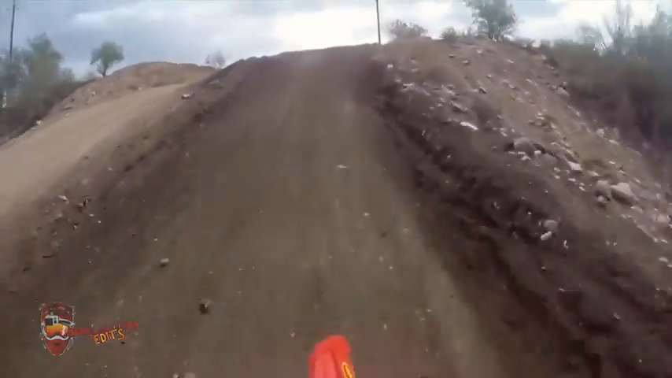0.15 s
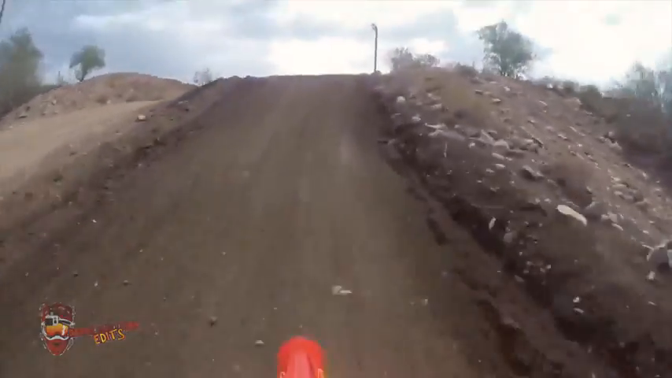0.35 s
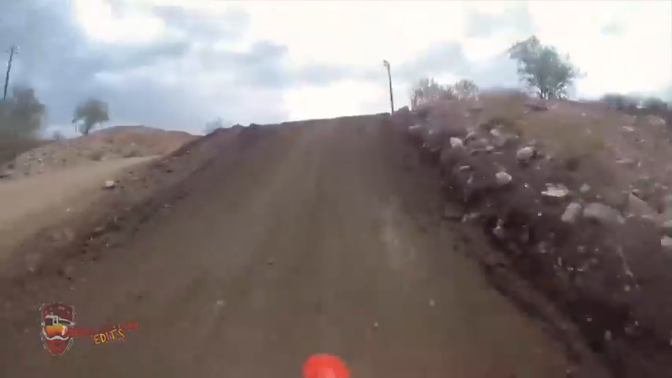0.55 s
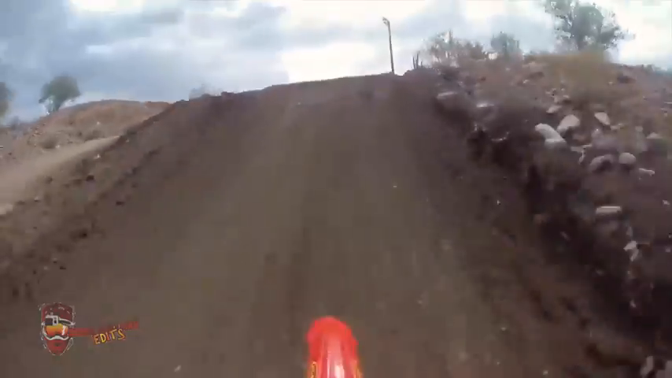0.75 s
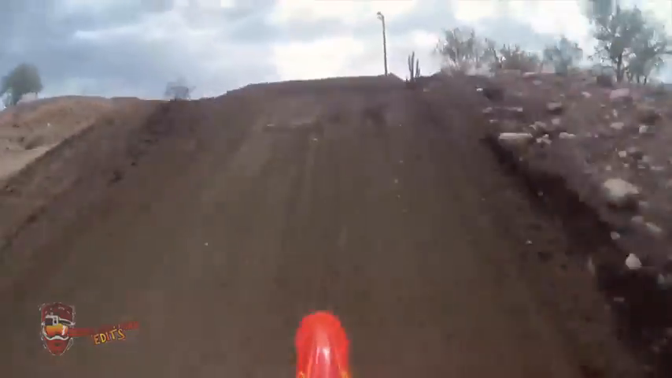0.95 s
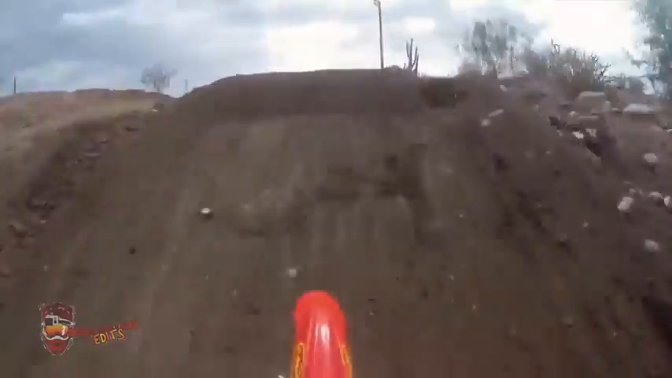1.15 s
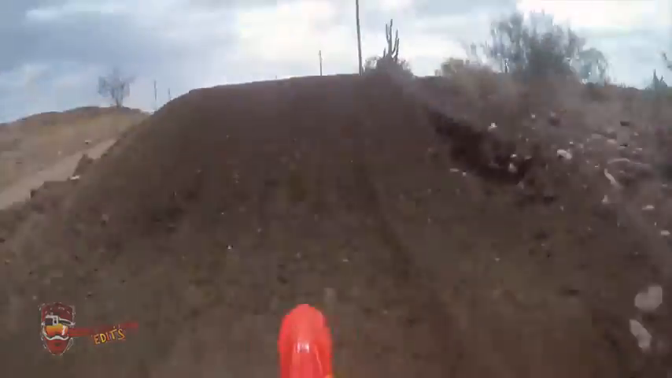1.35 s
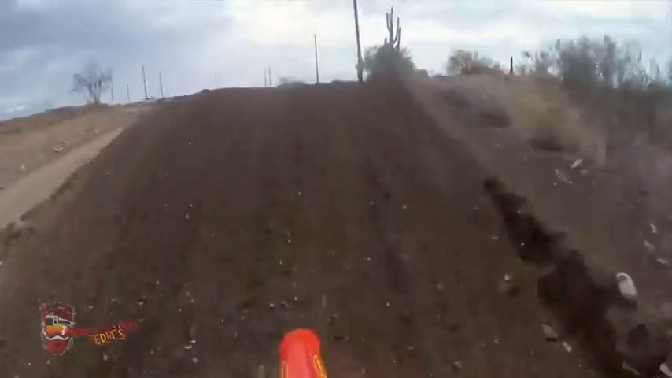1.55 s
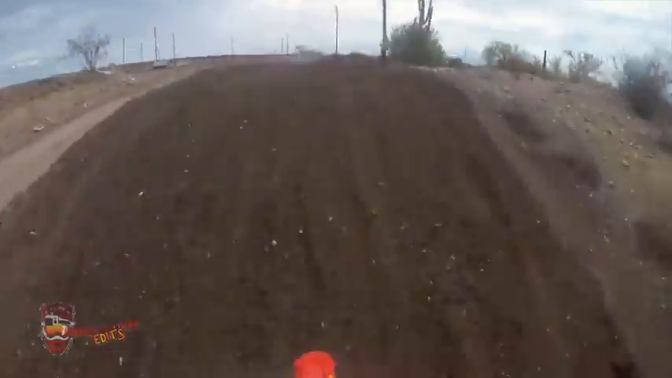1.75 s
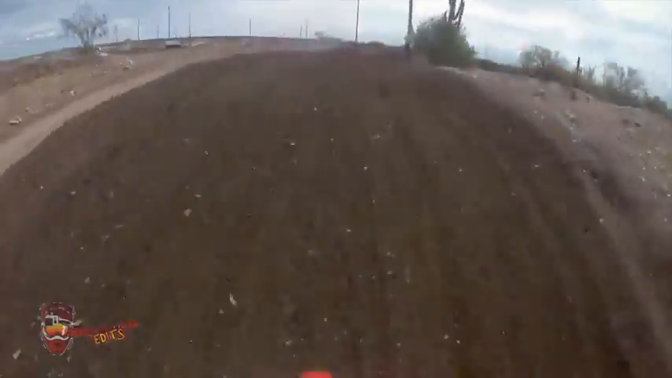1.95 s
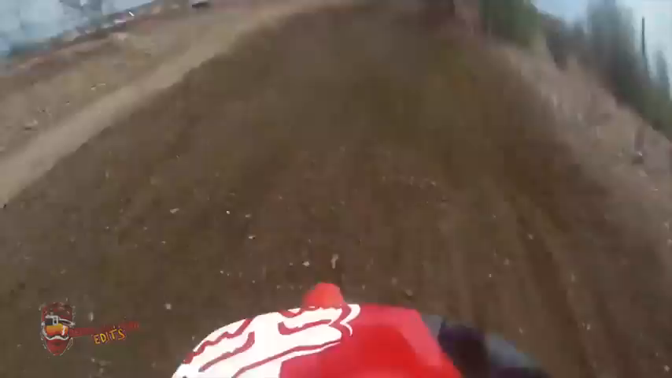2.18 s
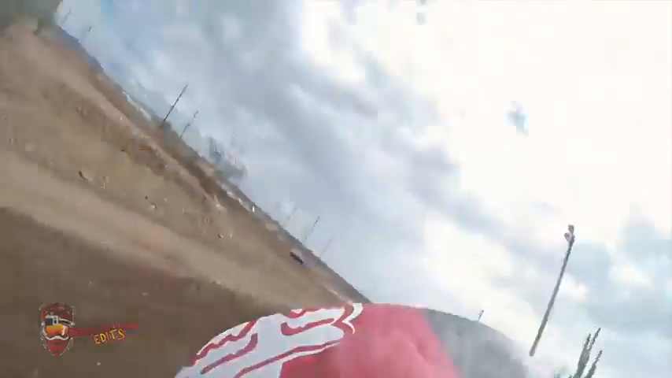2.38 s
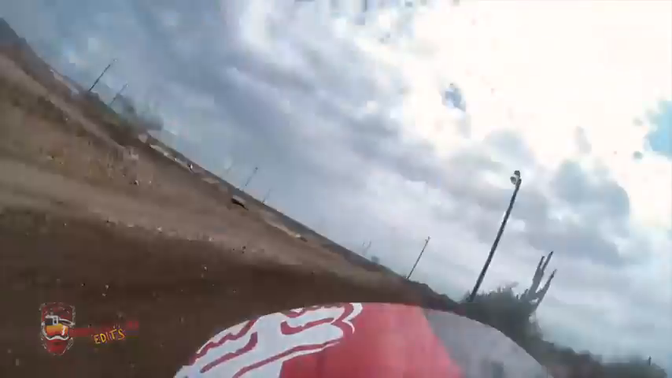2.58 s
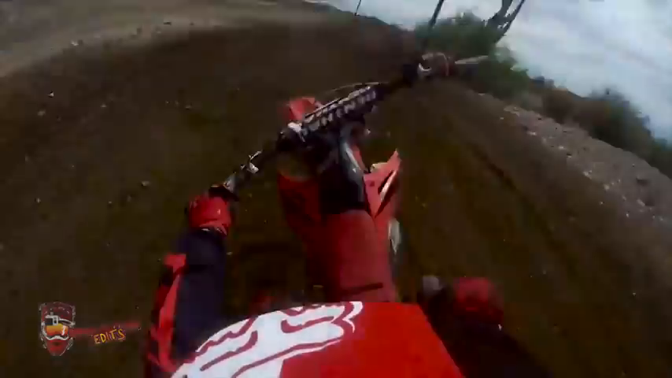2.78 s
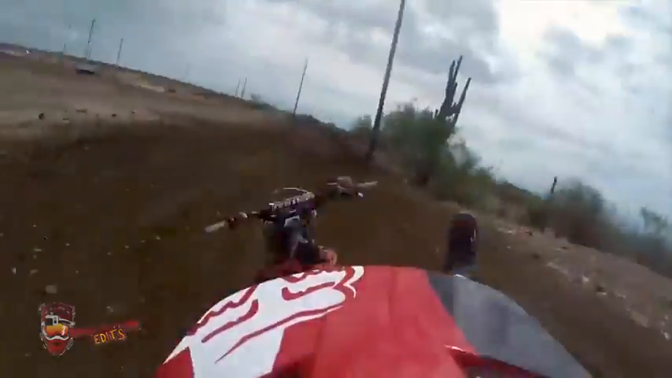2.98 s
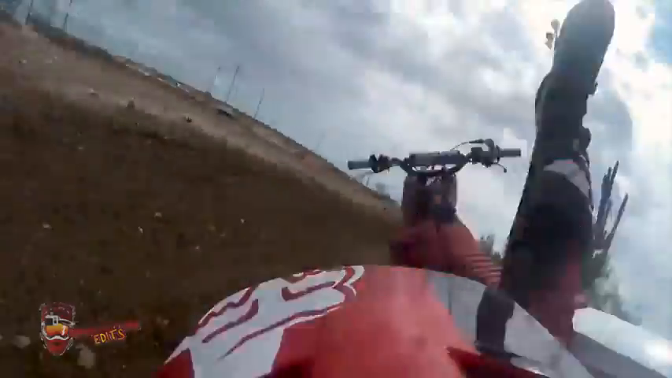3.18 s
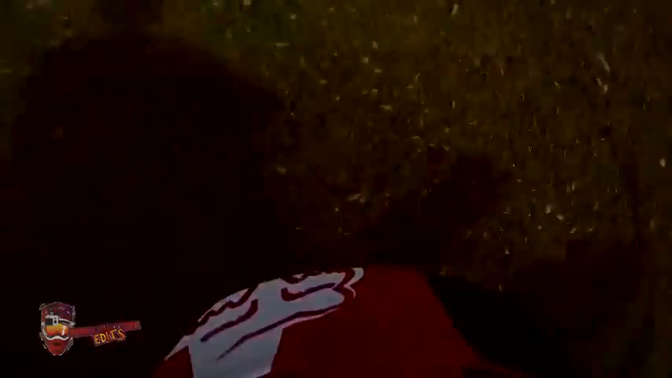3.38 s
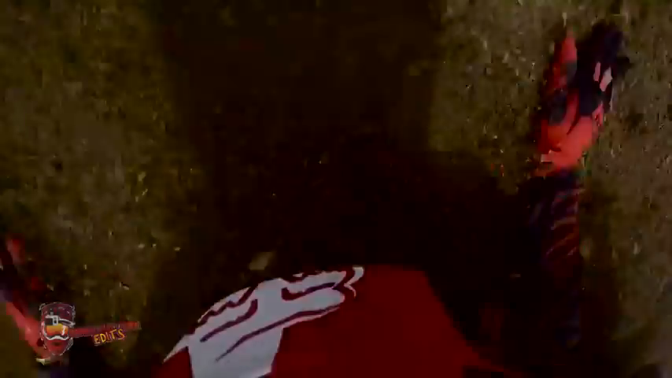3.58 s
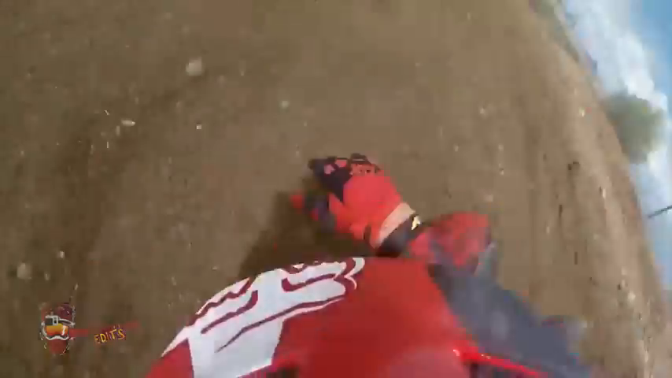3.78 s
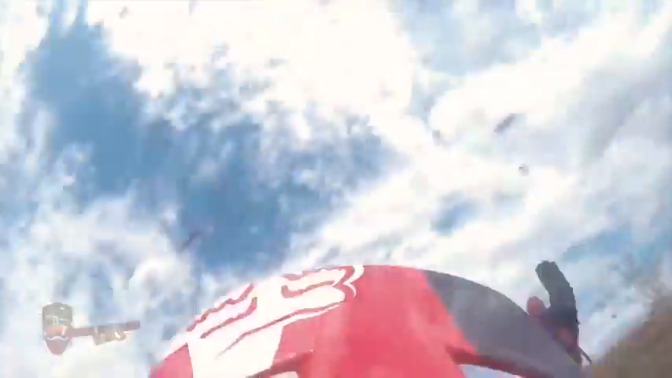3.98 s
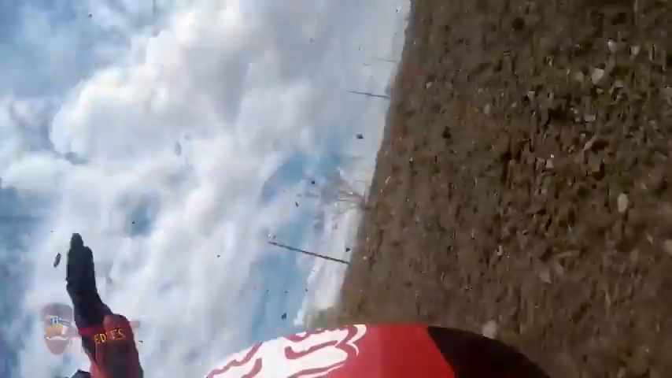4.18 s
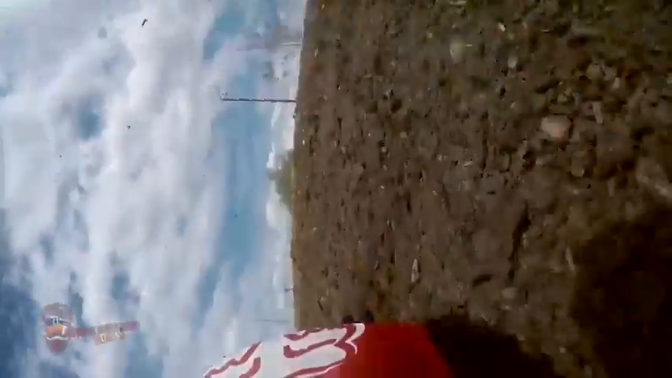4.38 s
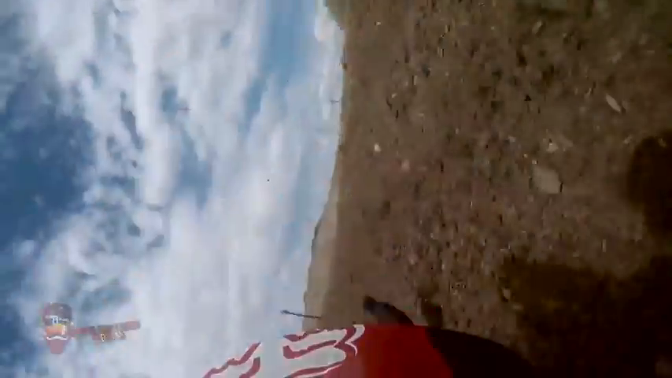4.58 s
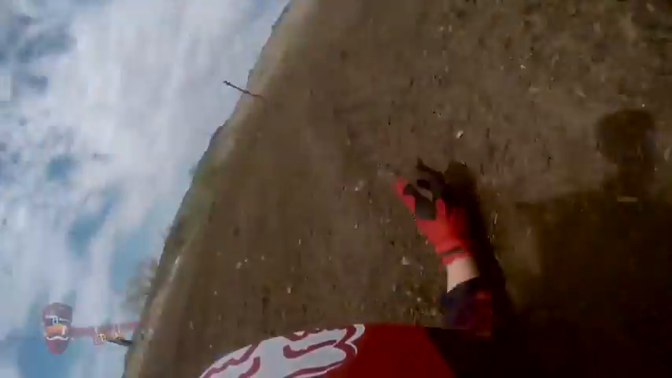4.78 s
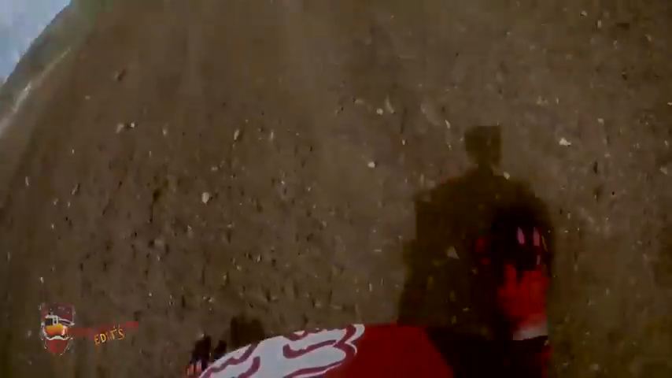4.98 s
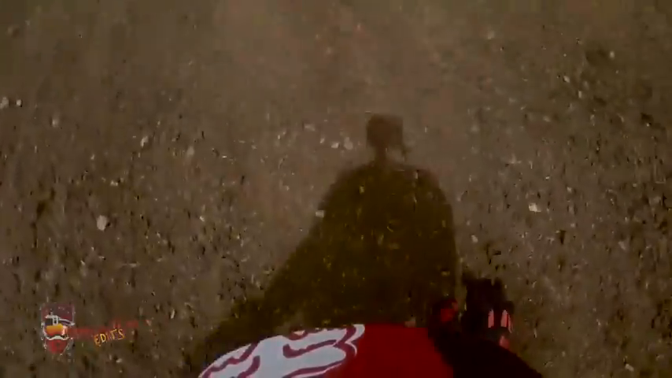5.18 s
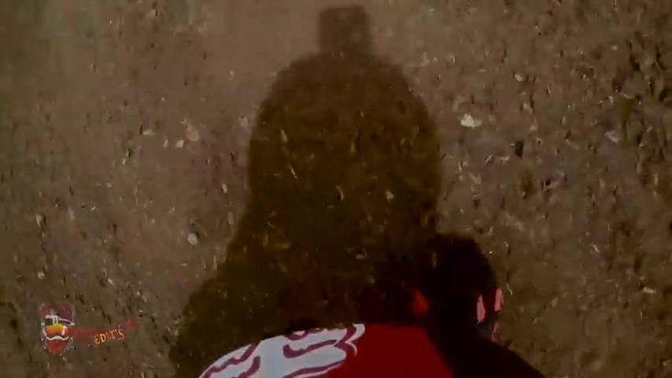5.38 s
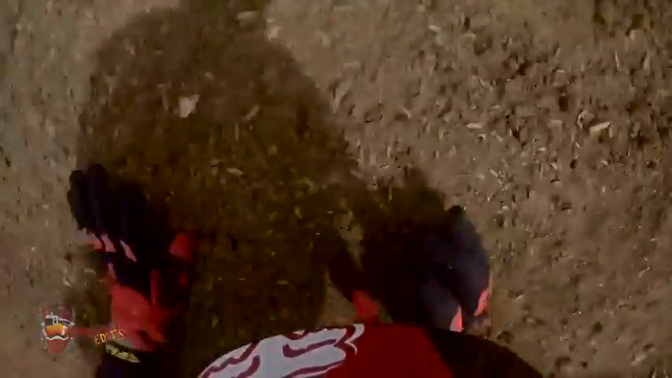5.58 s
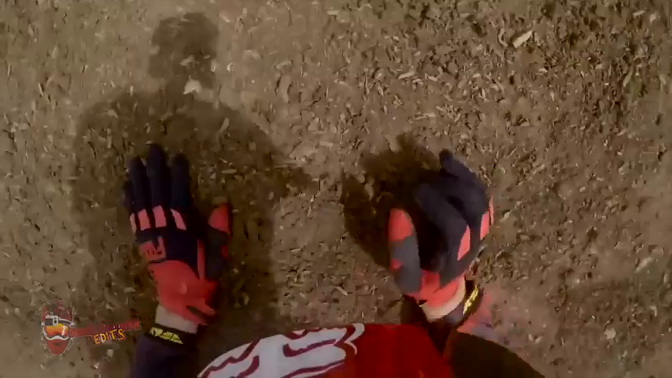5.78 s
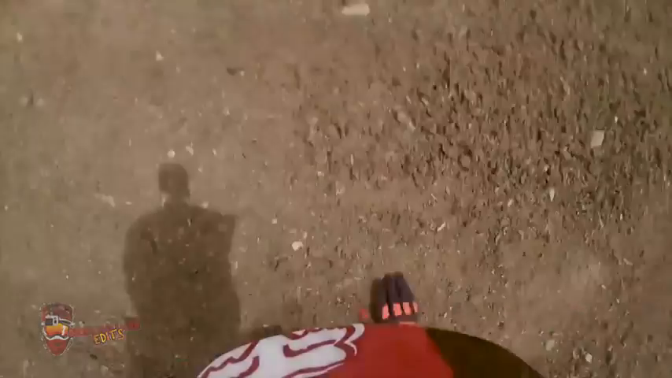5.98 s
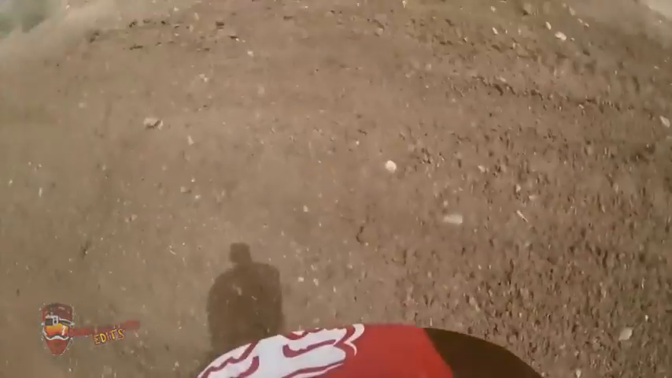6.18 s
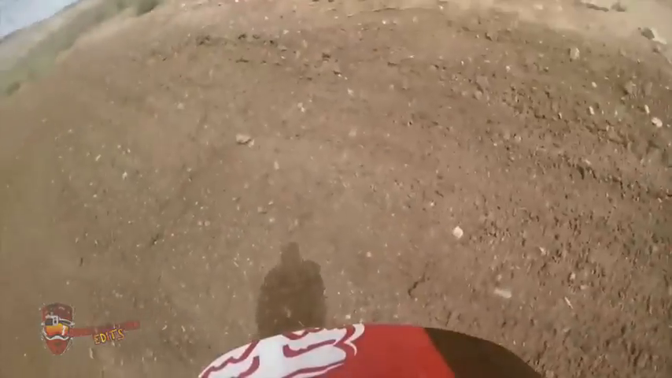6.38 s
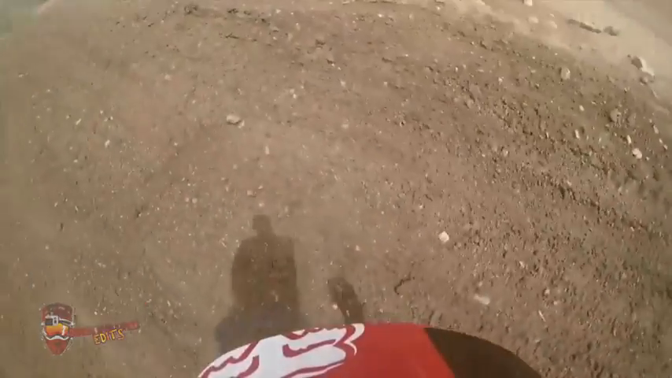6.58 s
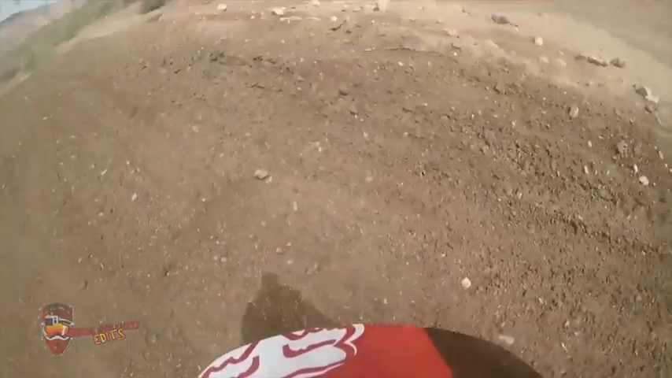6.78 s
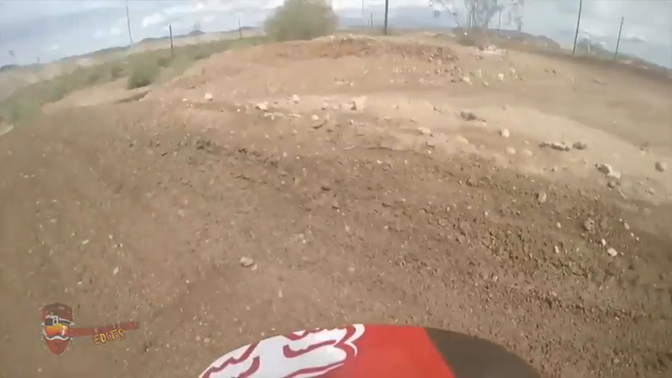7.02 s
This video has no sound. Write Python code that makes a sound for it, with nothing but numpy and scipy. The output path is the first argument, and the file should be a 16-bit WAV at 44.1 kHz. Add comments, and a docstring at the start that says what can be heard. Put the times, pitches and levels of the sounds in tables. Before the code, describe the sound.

A dirt bike engine rasps and screams higher up a jump, snaps off, then the rider tumbles with heavy thumps, helmet knocks, scrapes and grit.

```python
"""On a dirt jump, at a microphone on the rider's helmet camera: a single-cylinder dirt bike climbs.
Harmonic orders of the crank, turbulence and gear whine waver as the tyre grips and slips, soar at the lip,
then stop as the throttle snaps shut. The rider tumbles: struck modes of the helmet knock, scrape and squeal,
stones and grit spray on it, and the springy camera mount thumps with every jolt. Coloured noise makes the
wind on the mount, a rush of air and dirt whose level dips and swells back, and the faint microphone hiss."""
import sys
import numpy as np
from scipy import signal
from scipy.fft import rfft, irfft, next_fast_len
from scipy.io import wavfile
from scipy.ndimage import uniform_filter1d

SR = 44100
rng = np.random.default_rng(int(sys.argv[2]) if len(sys.argv) > 2 else 0)


def bounce(signal):
    """Save signal as a 16-bit WAV file at the path given by the first command-line argument."""
    frames = np.transpose(np.atleast_2d(signal))
    limited = np.clip(frames, -1, 1)
    pcm = np.round(limited * 32767).astype(np.int16)
    wavfile.write(sys.argv[1], SR, pcm)


N = 310905
TIME = np.arange(N) / SR
THROTTLE_SHUT_S = 2.161


def from_db(db):
    """Logarithmic levels: decibels to amplitude gain."""
    return 10 ** (np.asarray(db) / 20)


def rms_one(x):
    """Normalisation: scale to unit mean power."""
    return x / np.sqrt(np.mean(x ** 2) + 1e-20)


def levelled(x):
    """Levelling: divide by the running RMS over about 60 ms."""
    power = uniform_filter1d(x ** 2, size=2600)
    return x / np.sqrt(np.abs(power) + 1e-6)


def in_time(rows):
    """Linear interpolation: each column of a curve at every sample."""
    s, *columns = np.transpose(rows)
    return [np.interp(TIME, s, c) for c in columns]


def drift(rate):
    """Band-limited chance: random knots, rate per second, joined by lines; unit RMS."""
    knots = rng.standard_normal(N // 8)
    return rms_one(np.interp(TIME * rate, np.arange(len(knots)), knots))


def coloured(x, spectrum):
    """Linear filtering: a (pitch_hz, level_db) response on a log-frequency axis; unit power."""
    hz, db = np.transpose(spectrum)
    size = next_fast_len(N)
    log_f = np.log(np.fft.rfftfreq(size, 1 / SR) + 1)
    # silent beyond both ends of the response
    gain = from_db(np.interp(log_f, np.log(hz), db, -np.inf, -np.inf))
    return rms_one(irfft(rfft(x, size) * gain, size)[:N])


def add(track, s, sound):
    """Superposition: mix a sound in at a time."""
    start = int(np.clip(s * SR, 0, N - 1))
    track[start:start + len(sound)] += sound[:N - start]


# crank speed under power; columns: start_s [s], speed [turns/s]
REVS_TABLE = [(0.02, 133), (0.14, 155), (0.19, 142), (0.27, 182), (0.35, 209), (0.41, 149), (0.52, 168),
              (0.56, 143), (0.6, 160), (0.69, 159), (0.74, 148), (0.83, 162), (0.95, 160), (1.03, 173),
              (1.08, 144), (1.17, 185), (1.21, 143), (1.3, 167), (1.37, 129), (1.43, 124), (1.48, 162),
              (1.52, 125), (1.66, 187), (1.73, 209.5), (1.87, 224), (2.07, 234), (2.17, 245)]
# crank speed with the throttle shut; columns: start_s [s], speed [turns/s]
COASTING_REVS = [(2.3, 214), (2.6, 174), (2.9, 171), (3.08, 200), (3.27, 208), (3.6, 220)]


def crank(wobble):
    """Phase is the integral of speed: crank angle in radians, with random cycle-to-cycle wobble."""
    speed, = in_time(list(REVS_TABLE) + list(COASTING_REVS))
    return 2 * np.pi * np.cumsum(speed) / SR + wobble * drift(130)


def firing(angle, start_s, end_s, half_db, waver_db, count=66, size=30):
    """Fourier series: wavering crank orders make pulses; the four-stroke cycle adds half orders."""
    phases = rng.uniform(0, 2 * np.pi, count)
    live = slice(*np.searchsorted(TIME, [start_s, end_s]))
    knots_s = np.linspace(start_s, end_s, size)
    pulses = np.zeros(N)
    for k in range(1, count):
        # odd k are the half orders
        gains = from_db(half_db * (k % 2) + waver_db * rng.standard_normal(size))
        order = np.cos(k * angle[live] / 2 + 0.75 * phases[k])
        pulses[live] += np.interp(TIME[live], knots_s, gains) * order
    return pulses


# engine load on a decibel scale; columns: start_s [s], level_db [dB]
LOAD_TABLE = [(0.0, -38), (0.25, -33.5), (0.53, -40.5), (1.15, -36.5), (1.26, -38.5), (1.28, -42),
              (1.36, -49.5), (1.43, -46.5), (1.44, -38.5), (1.55, -39), (1.75, -31), (1.86, -34),
              (1.9, -32.5), (2.05, -33), (2.15, -34)]
CRUISE_DB = -37  # the load that counts as cruising
# the engine cleans up near the top; columns: speed [turns/s], turbulent share of the rasp [0-1]
TURBULENT_SHARE = [(130, 0.46), (160, .42), (210, 0.36), (245, 0.01)]
# resonances of the exhaust pipe; columns: pitch_hz [Hz], level_db [relative dB]
PIPE_COLOUR = [(560, -4), (700, -8), (900, -5.5), (1000, -8.5), (1190, .5), (1290, -1), (1440, -2),
               (1650, -5.5), (1900, -11), (2200, -32)]
# resonances of the rasp; columns: pitch_hz [Hz], level_db [relative dB]
RASP_COLOUR = [(1500, -61), (1850, -2.5), (2060, 13), (2300, 8), (2430, -2), (2600, 10), (2750, -0.5),
               (2950, -3.5), (3150, -18), (3600, -14), (4400, -49)]
# resonances of the engine's hiss; columns: pitch_hz [Hz], level_db [relative dB]
HISS_COLOUR = [(1880, -52), (3200, 0), (3460, -9), (4090, 3.5), (4220, -1), (4480, -8), (5220, -0.5),
               (5910, -3.5), (6400, -2), (7210, -8.5), (8120, -9.5), (9510, -21.5), (12400, -18.5),
               (14500, -31), (15500, -33)]
# each part of the engine: level at cruising load (dB) and its share of the load's swing
BOOM_DB, BOOM_FOLLOWS = -1.5, 0.97
PIPE_DB, PIPE_FOLLOWS = -26, 0.99
RASP_DB, RASP_FOLLOWS = -24, 0.74
HISS_DB, HISS_FOLLOWS = -37, 1.21
BURBLE_DB = -39  # follows the load as the rasp does


def engine(angle):
    """Source-filter principle: load drives orders, pulses and turbulence through fixed resonances."""
    load_db = in_time(LOAD_TABLE)[0] - CRUISE_DB
    speed, = in_time(REVS_TABLE)
    rough = np.interp(speed, *np.transpose(TURBULENT_SHARE))
    pulses = firing(angle, 0, THROTTLE_SHUT_S, half_db=-21, waver_db=6.5)
    pulses *= from_db(1.9 * drift(160))
    puffs = rng.standard_normal(N) * (1 + 0.058 * np.cos(angle) + 0.093 * np.cos(angle / 2))

    def band(spectrum, turbulent):
        """Power sharing: pulses and turbulence through the same resonances."""
        turbulent = np.clip(turbulent, 0, 1)
        tonal = np.sqrt(1 - turbulent) * levelled(coloured(pulses, spectrum))
        return tonal + np.sqrt(turbulent) * coloured(puffs, spectrum)

    boom = from_db(BOOM_DB + BOOM_FOLLOWS * load_db) * exhaust_boom(angle, speed, waver_db=2.5)
    pipe = from_db(PIPE_DB + PIPE_FOLLOWS * load_db) * band(PIPE_COLOUR, 0.5 * rough)
    rasp = from_db(RASP_DB + RASP_FOLLOWS * load_db) * band(RASP_COLOUR, rough)
    hiss = from_db(HISS_DB + HISS_FOLLOWS * load_db) * band(HISS_COLOUR, rough + 0.52)
    burble_colour = [(110, -28.0), (200, 13), (310, 8), (480, 5.5), (700, -19), (900, -20)]
    burble = from_db(BURBLE_DB + RASP_FOLLOWS * load_db) * coloured(puffs, burble_colour)
    throttle = np.clip((THROTTLE_SHUT_S - TIME) / 0.0016, 0, 1)  # shuts within 1.6 ms
    return throttle * (boom + pipe + rasp + hiss + burble + gears(angle, flutter=0.0076))


# what the silencer lets through of a low order; columns: pitch_hz [Hz], level_db [relative dB]
SILENCER_RESPONSE = [(70, -27), (130, -45), (160, -31), (185, -25), (212, -21.5), (225, -17.5),
                     (234, -19.5), (248, -11), (270, -24), (298, -19), (325, -26), (375, -26.5),
                     (420, -40.5), (470, -29), (560, -31), (620, -49.5), (670, -41), (900, -81.5)]


def exhaust_boom(angle, speed, waver_db, count=4):
    """Resonance: the lowest orders swell and fade as the revs carry them through the silencer."""
    hz, db = np.transpose(SILENCER_RESPONSE)
    boom = np.zeros(N)
    for order in range(1, count + 1):
        level_db = np.interp(order * speed, hz, db) + waver_db * drift(70)
        boom += np.sqrt(2) * from_db(level_db) * np.sin(order * angle + order ** 2)
    return boom


# whine of the gears; columns: start_s [s], pitch_hz [Hz], level_db [dB]
GEAR_WHINE = [(0, 2054, -36), (.5, 2039, -45), (1.0, 2200, -53), (1.28, 2163, -31.5), (1.41, 2034, -26.5),
              (1.5, 2004, -38), (1.64, 2078, -21.5), (1.8, 2137, -29.5), (1.95, 2143, -22),
              (2.16, 2268, -30)]


def gears(angle, flutter):
    """Amplitude modulation: meshing teeth whine; the crank's uneven pull adds sidebands."""
    hz, db = in_time(GEAR_WHINE)
    mesh = 2 * np.pi * np.cumsum(hz * (1 + flutter * drift(90))) / SR
    waver_db = 3 * drift(35)
    return np.sqrt(2) * from_db(db + waver_db) * np.sin(mesh) * (1 + 0.41 * np.cos(angle))


# jolts of the camera mount; columns: centre_s [s], level_db [dB], pitch_hz [Hz], swell_s [s]
MOUNT_JOLTS = [(0.305, -6.5, 86.14, 0.013), (0.466, -4.5, 86, 0.009), (0.634, -6, 85.3, 0.012),
               (1.226, -7.5, 56.3, 0.0073), (1.531, -5.5, 84.6, 0.016), (2.045, -12, 24, 0.017),
               (2.181, 1.5, 106, 0.0028), (2.315, -8, 101, 0.0054), (2.471, -0.5, 103, 0.0025),
               (2.859, -6, 69, 0.0058), (2.889, -10, 67, 0.0057), (2.932, -13.5, 44, 0.025),
               (2.956, -1.5, 99, 0.0026), (3.281, -5.5, 82, .012), (3.343, -13.5, 39.4, 0.019),
               (3.457, -8, 87, 0.0039), (3.757, -4, 72.5, 0.0044), (3.883, -2.5, 100, 0.0039),
               (3.927, -10, 87, 0.0037), (4.115, -3.5, 67, 0.006), (4.133, 3, 118, 0.0016),
               (4.167, -7, 93, 0.0023), (4.497, 1.5, 76, 0.0027), (5.347, -0.4, 97.6, 0.0071),
               (5.494, -10.5, 87, 0.01), (5.529, 1, 104, 0.0036), (5.611, -2, 106, 0.0069),
               (6.416, -13.5, 71, 0.0098), (6.53, -8, 69.5, 0.0092), (6.598, 0.5, 66.4, .006),
               (6.924, -3, 76, 0.0084)]


def jolts(mount_hz, mount_t60, mount_db, size=13230):
    """Forced and free vibration: each jolt shoves the camera to and fro; its springy mount rings on."""
    out = np.zeros(N)
    t = np.arange(size) / SR - .08  # the swell begins ahead of its centre
    for s, db, hz, swell_s in MOUNT_JOLTS:
        shove = -np.exp(-(t / swell_s) ** 2 / 2) * np.sin(2 * np.pi * hz * t)
        after = ring(shove, mount_hz, mount_t60)
        after = from_db(mount_db) * after / np.abs(after).max()
        add(out, s + t[0], from_db(db) * (shove + after))
    return out


def ring(force, hz, t60):
    """Damped harmonic oscillator: one mode driven by a force."""
    r, w = from_db(-60 / (max(t60, .001) * SR)), 2 * np.pi * hz / SR
    return signal.lfilter([0, np.sin(w)], [1, -2 * r * np.cos(w), r * r], force + 1e-18)


def body(force, modes):
    """Modal superposition: a force rings all the modes of one part."""
    return sum((-1) ** k * from_db(db) * ring(force, hz, t60) for k, (hz, db, t60) in enumerate(modes))


def strike(modes, crunch_s, crunch, size=4410):
    """Impulse response: a contact and its crumbling aftermath ring the modes; set to 10 ms of unit power."""
    t = np.arange(size) / SR
    force = crunch * rng.standard_normal(size) * rng.exponential(1, size) * np.exp(-t / crunch_s)
    force[0] += 1
    # each strike excites the modes a little differently
    varied = [(hz, db + rng.normal(0, 2.8), t60) for hz, db, t60 in modes]
    sound = body(force, varied)
    return sound / np.sqrt(np.sum(sound ** 2) / (SR / 100))


# modes of the helmet shell; columns: pitch_hz [Hz], level_db [relative dB], t60_s [s]
SHELL_MODES = [(660,-21.5,.012),(910,-4.5,0.0075),(1188,-5,0.026),(1362,0.5,0.017),(1686,-0.5,0.011),(1950,-0.5,0.011),(2284,2,0.012),(2609,-1,0.0089),(3256,-13.5,0.0055)]
# modes of the camera case; columns: pitch_hz [Hz], level_db [relative dB], t60_s [s]
CASE_MODES = [(3883,6.5,0.0037),(5300,-3.5,0.009),(5870,-2,0.0029),(7900,-5,0.003),(8800,-6,0.0014),(12440,-23,.004)]
# modes of the helmet padding; columns: pitch_hz [Hz], level_db [relative dB], t60_s [s]
PADDING_MODES = [(167.3,-3,0.055),(250,-2,0.02),(383,-3.5,0.012),(630,-6.5,0.007)]
# blows on the helmet; columns: start_s [s], then relative levels:
# shell ring level_db [dB], padding thud level_db [dB], case crack level_db [dB]
HELMET_BLOWS = [(2.175, -21, -10.5, -33), (2.2083, -20.5, -21, -33), (2.277, -11.5, -9, -40),
                (2.2864, -33, -12, -42), (2.466, -28, -12, -35.5), (2.9151, -3.5, -12, -43),
                (2.924, -2.5, -21, -16), (2.9497, -19.5, -9.5, -36), (3.3295, -17.5, -15, -49),
                (3.3425, -1.5, -27, -17), (3.4009, -22, -29, -48), (3.419, -14.5, -20.5, -57),
                (3.4484, -16, -19.5, -48), (3.584, -20, -39, -48), (3.6211, -5, -23, -34),
                (3.8772, -10.5, -6, -53), (3.882, -7.5, -13, -28), (3.91, -18, -20, -58),
                (3.9211, -23, -18, -31), (4.1189, -31, -14, -29), (4.1324, -14, -7, -27.5),
                (4.4699, -13, -38, -34), (4.4813, -10.5, -12.5, -29), (4.8514, -10, -47, -20),
                (5.215, -27.5, -38, -50), (5.3337, -27, -16, -44), (5.5261, -40, -19, -39),
                (5.6074, -34, -19, -42.5), (6.1753, -28, -41, -71), (6.3884, -31, -32, -62),
                (6.4892, -20.5, -27.5, -70)]


def knocks(thud_db, ring_db, crack_db):
    """Impact excitation: the ground thuds on the padding, rings the shell and cracks on the case."""
    out = np.zeros(N)
    for s, shell_db, padding_db, case_db in HELMET_BLOWS:
        add(out, s, from_db(padding_db + thud_db) * strike(PADDING_MODES, crunch_s=0.005, crunch=0.047))
        add(out, s, from_db(shell_db + ring_db) * strike(SHELL_MODES, crunch_s=0.0022, crunch=0.09))
        add(out, s, from_db(case_db + crack_db) * strike(CASE_MODES, crunch_s=0.0032, crunch=0.02))
    return out


# helmet and gloves dragging through dirt; columns: start_s [s], length_s [s],
# crunch level_db [relative dB], thud level_db [relative dB]
DIRT_SCRAPES = [(2.273, 0.023, -24, -12), (2.925, 0.04, -35, -31), (3.328, 0.025, -33, -16),
                (3.442, 0.031, -32.5, -30), (3.564, 0.13, -31, -52), (3.629, 0.017, -14.5, -23.5),
                (3.878, .014, -22, -14.5), (4.114, 0.03, -26, -27), (4.462, 0.041, -22, -21.5),
                (4.575, 0.12, -38.5, -32), (5.328, 0.032, -36.5, -19.5), (5.518, 0.017, -36, -32.5),
                (5.599, 0.018, -40, -29), (6.492, 0.023, -44, -29), (6.579, 0.019, -45, -27),
                (6.914, 0.055, -50, -36), (6.988, 0.075, -47, -40)]


def scrapes(grain_db):
    """Friction noise: dense grains under a sliding contact ring shell and case and drum on the padding."""
    crunch, thud = np.zeros(N), np.zeros(N)
    for s, length_s, crunch_db, thud_db in DIRT_SCRAPES:
        along = np.linspace(0, 1, max(int(length_s * SR), 2))
        press = np.sqrt(np.minimum(along * 8, 1) * (1 - along))
        add(crunch, s, from_db(crunch_db) * press)
        add(thud, s, from_db(thud_db) * press)
    grains = rng.standard_normal(N) * from_db(grain_db * drift(700))

    def rubbed(force, modes):
        """Scaling: level relative to grains pressed steadily at unit force."""
        return body(grains * force, modes) / body(grains, modes).std()

    low_pass = signal.butter(2, 6500, fs=SR, output="sos")
    soft_case = signal.sosfilt(low_pass, rubbed(crunch, CASE_MODES))
    return rubbed(crunch, SHELL_MODES) + from_db(-14.5) * soft_case + rubbed(thud, PADDING_MODES)


# the shell grabs the ground, then rings on; columns: pitch_hz [Hz], level_db [dB], t60_s [s]
SQUEAL_MODES = [(2576, -1.5, 0.019), (2650, -37.5, 0.35)]
SQUEAL_S = 3.6228


def squeal():
    """Exponential decay: a short cry of the shell leaves a faint ring."""
    t = np.maximum(TIME - SQUEAL_S, 0)
    cry = np.zeros(N)
    for hz, db, t60 in SQUEAL_MODES:
        cry += from_db(db - 60 * np.minimum(t / t60, 3)) * np.sin(2 * np.pi * hz * t)
    return np.minimum(t / 0.0015, 1) * cry


# stones striking the camera; columns: start_s [s], level_db [relative dB],
# crack against ring [relative dB]
STONE_TICKS = [(3.9573, -14, -18), (3.974, -20, -8), (4.0044, -15.5, 1.5), (4.0392, -15.5, -13),
               (4.0768, -13.5, -10), (4.25, -30, -5.5), (4.416, -27.5, 18), (4.8125, -23.5, 1),
               (4.837, -33, -13), (5.715, -31, -9), (5.901, -33, -14), (6.099, -32.5, -9.5),
               (6.623, -23, -21.5), (6.6732, -24, -15), (6.6927, -27, -15), (6.702, -26, -22),
               (6.7152, -32, -16)]
# spray of grit; columns: start_s [s], rate [grains/s], level_db [relative dB]
GRIT_SPRAY = [(3.65, 60, -50), (3.93, 200, -39.5), (3.97, 1200, -34.5), (4.12, 1300, -45.5),
              (4.16, 150, -45.5), (4.3, 34, -43), (4.9, 120, -41.5), (5.3, 10, -50.5)]
# colour of the grit; columns: pitch_hz [Hz], level_db [relative dB per Hz]
GRIT_COLOUR = [(700, -10.5), (1300, 1.5), (2500, 3.5), (4200, -5.5), (6500, -8), (9000, -18),
               (12300, -17.5), (15500, -25)]


def stones(ring_db, crack_db):
    """Random arrivals: stones tick on shell and case, amid a Poisson-like spray of finer grit."""
    out = np.zeros(N)
    for s, level_db, sharp_db in STONE_TICKS:
        tick = from_db(ring_db) * strike(SHELL_MODES, crunch_s=0.0033, crunch=0.39)
        tick += from_db(sharp_db + crack_db) * strike(CASE_MODES, crunch_s=0.0041, crunch=0.052)
        add(out, s, from_db(level_db - max(sharp_db, 0)) * tick)
    per_s, grit_db = in_time(GRIT_SPRAY)
    spraying = (TIME > GRIT_SPRAY[0][0]) & (TIME < GRIT_SPRAY[-1][0])
    born = (rng.random(N) < per_s / SR) & spraying
    grit = born * rng.laplace(0, 1, N) * from_db(grit_db)
    return out + from_db(11.5) * grit.std() * coloured(grit, GRIT_COLOUR)


# wind on the mount; columns: start_s [s], level_db [relative dB]
BUFFET_LEVEL = [(0, -27.5), (.9, -29), (1.9, -27.5), (2.28, -26), (2.5, -40), (2.8, -30.5), (3.03, -39),
                (3.3, -24.5), (4.05, -32.5), (4.27, -36), (4.6, -27.5), (5.15, -45.5), (5.55, -30.5),
                (5.85, -47), (6.1, -39.5), (6.45, -32), (7.05, -29.5)]
# colour of that wind; columns: pitch_hz [Hz], level_db [relative dB]
WIND_COLOUR = [(12,-30),(20,-1),(32,-1.5),(50,-6.5),(70,-0.5),(92,3),(118,-6),(150,-13),(200,-31.5),(330,-33),(600,-37),(900,-71.5)]


def wind():
    """Turbulent pressure: low coloured noise shakes the mount in slow gusts."""
    buffet_db, = in_time(BUFFET_LEVEL)
    gusts = from_db(buffet_db + 4.0 + 0.63 * drift(22))
    return gusts * coloured(rng.standard_normal(N), WIND_COLOUR)


# rush of air and dirt past the helmet; columns: pitch_hz [Hz], level_db [relative dB]
AIR_COLOUR = [(150, -38), (250, -1.5), (401, -9.5), (687, -7.5), (760, -10.5), (869, -10.5), (962, -19.5),
              (1240, -2), (1540, -13.5), (2050, -8), (2830, -12), (3130, -19.5), (6340, -34.5), (6900, -39),
              (14000, -62.5)]
# the engine coasting behind the rider; columns: pitch_hz [Hz], level_db [relative dB per Hz]
COASTING_COLOUR = [(400, -27.5), (620, 7), (900, -5.5), (1250, -0.5), (1600, -10), (2120, 4.5),
                   (2600, -4.5), (3200, -24)]


def background(angle):
    """Shared envelope: one gain dips and swells the rushing noise and the coasting engine's orders."""
    grain = rng.standard_normal(N) * from_db(3.16 * drift(260))
    through_helmet = rms_one(body(grain, SHELL_MODES + CASE_MODES))
    rush = 0.77 * coloured(grain, AIR_COLOUR) + 0.13 * through_helmet
    loose_angle = angle + .05 * drift(110)
    pulses = firing(loose_angle, THROTTLE_SHUT_S, COASTING_REVS[-1][0], half_db=-22.5, waver_db=8.0)
    coasting = coloured(pulses, COASTING_COLOUR) * np.interp(TIME, [3.25, 3.6], [.33, 0])
    level = background_gain() * from_db(2.14 * drift(24))
    return level * (rush + coasting) * (TIME > THROTTLE_SHUT_S)


# swells of the background level between its dips; columns: start_s of the hold [s], hold_s [s],
# level_db [relative dB]
GAIN_SWELLS = [(2.163, 0.14, -39.5), (2.464, 0.0093, -41), (2.687, 0.238, -38), (3.228, 0.065, -42),
               (3.39, 0.073, -44), (3.561, 0.28, -43.5), (3.923, 0.24, -45.5), (4.406, 0.16, -46),
               (4.6, 0.15, -49), (4.911, 0.097, -44.5), (5.27, .32, -49), (6.186, 0.63, -50),
               (7.02, .03, -41.5)]
DUCKED_DB = -60  # gain at the bottom of a dip
RECOVERY_S, DUCKING_S, RECOVERY_CURVE = 0.36, .035, 2.3  # the curve is a power of time


def background_gain():
    """Gain envelope: the level recovers slowly, holds, then ducks quickly, at the listed times."""
    gain = from_db(DUCKED_DB)
    for s, hold_s, db in GAIN_SWELLS:
        away = np.maximum((s - TIME) / RECOVERY_S, (TIME - s - hold_s) / DUCKING_S)
        gain = np.maximum(gain, from_db(db) * np.clip(1 - away, 0, 1) ** RECOVERY_CURVE)
    return gain


def scene():
    """Superposition: every source adds at one microphone on the helmet."""
    angle = crank(wobble=0.067)
    blows = knocks(thud_db=-6.5, ring_db=-14.0, crack_db=-12.0) + stones(ring_db=-14.0, crack_db=-12.5)
    mount = jolts(mount_hz=88.6, mount_t60=0.17, mount_db=-13.0)
    tumble = mount + blows + scrapes(grain_db=4.5) + squeal()
    return (engine(angle) + wind() + background(angle) + tumble)[None]


# hiss of the microphone; columns: pitch_hz [Hz], level_db [relative dB per Hz]
MIC_COLOUR = [(2000, -0.5), (6000, 5), (9000, -2.5), (12500, -6.5), (15000, -25.5)]
MIC_HISS_DB, CUTOFF_HZ = -77, 15600


def record(dry):
    """Noise floor, overload and band limit: faint hiss is added, peaks clip, and the top is cut."""
    hiss = from_db(MIC_HISS_DB) * coloured(rng.standard_normal(N), MIC_COLOUR)
    clipped = np.clip(dry + hiss, -1, 1)
    low_pass = signal.ellip(10, .1, 80, CUTOFF_HZ, fs=SR, output="sos")
    return signal.sosfilt(low_pass, clipped)


dry = scene()
out = record(dry)
bounce(out)
```